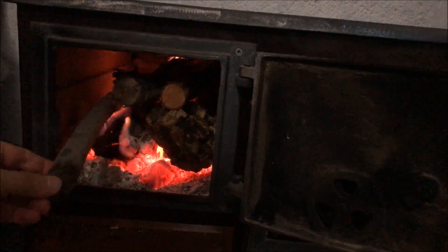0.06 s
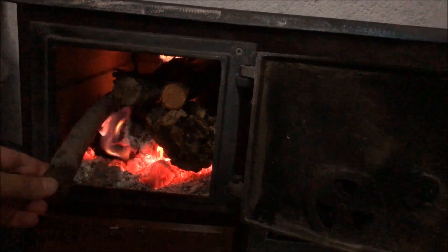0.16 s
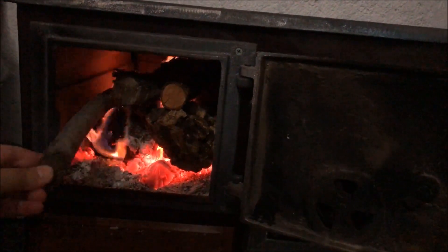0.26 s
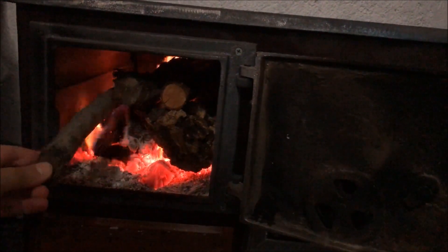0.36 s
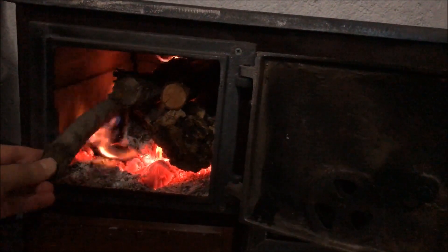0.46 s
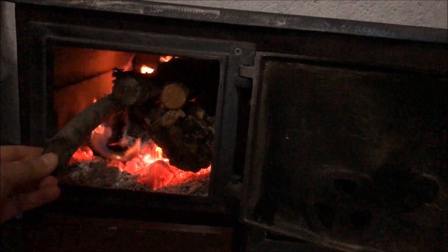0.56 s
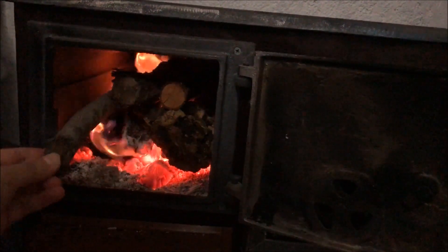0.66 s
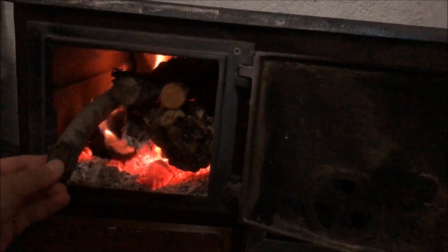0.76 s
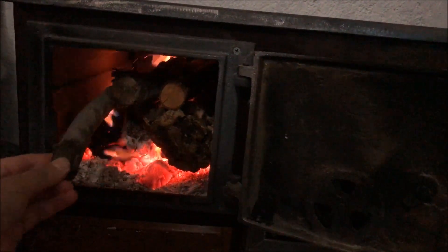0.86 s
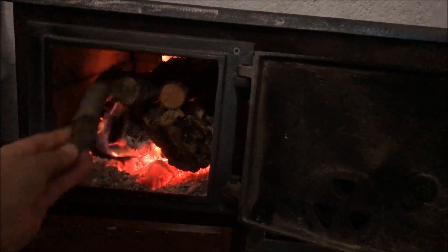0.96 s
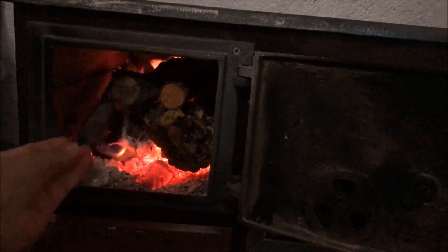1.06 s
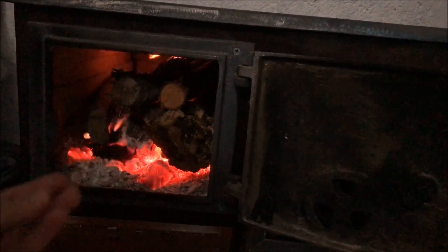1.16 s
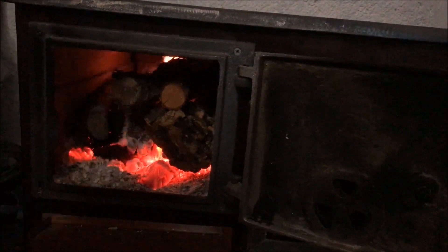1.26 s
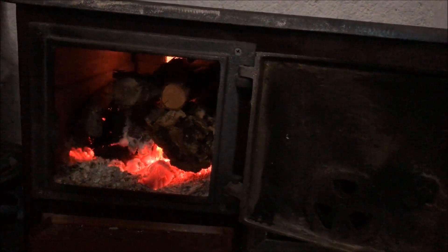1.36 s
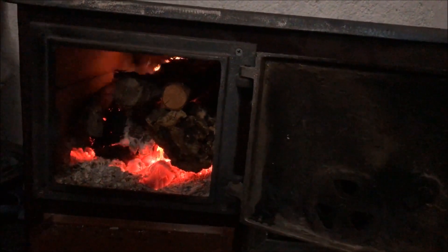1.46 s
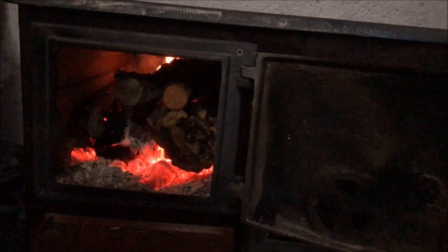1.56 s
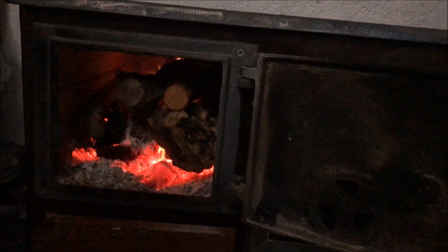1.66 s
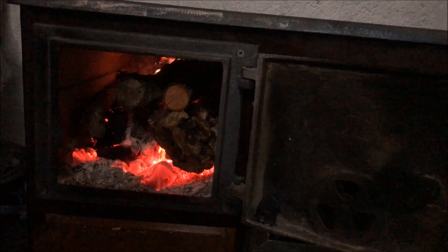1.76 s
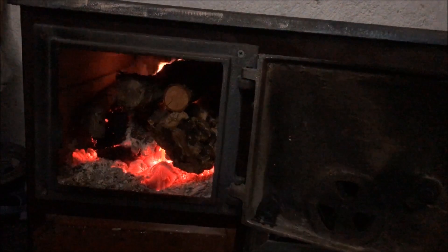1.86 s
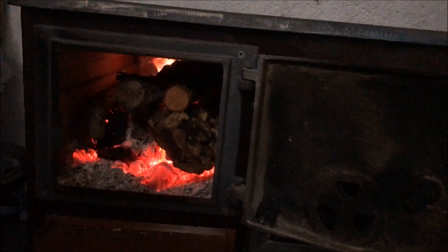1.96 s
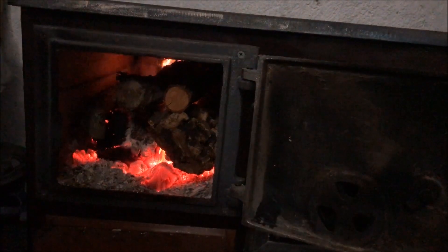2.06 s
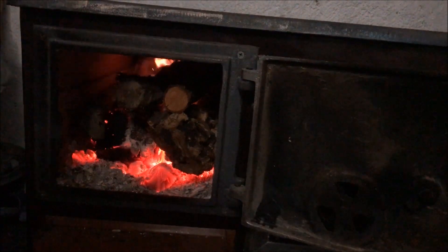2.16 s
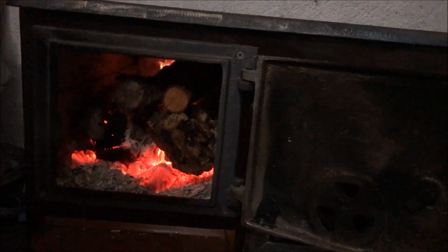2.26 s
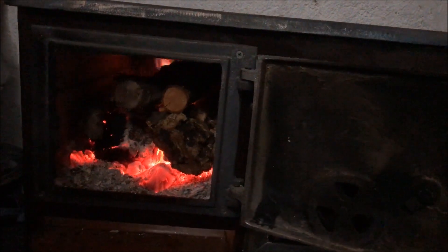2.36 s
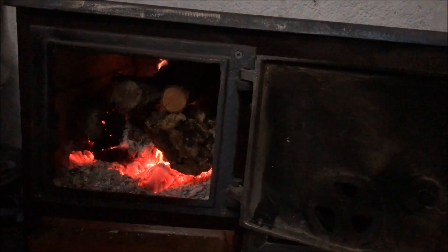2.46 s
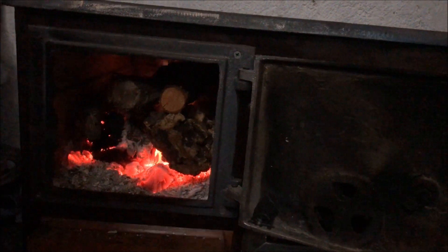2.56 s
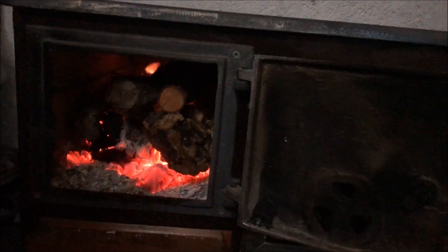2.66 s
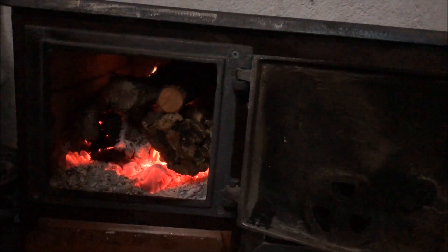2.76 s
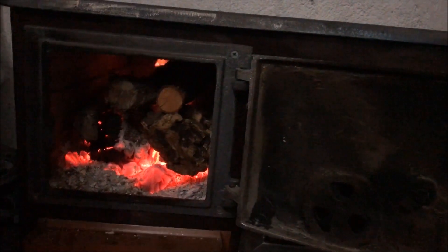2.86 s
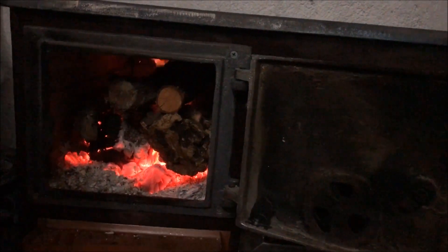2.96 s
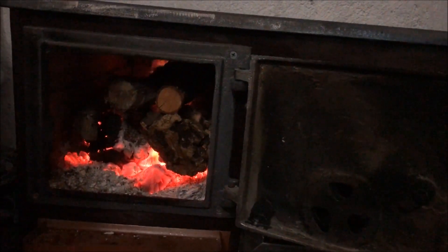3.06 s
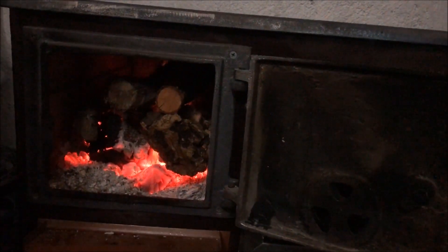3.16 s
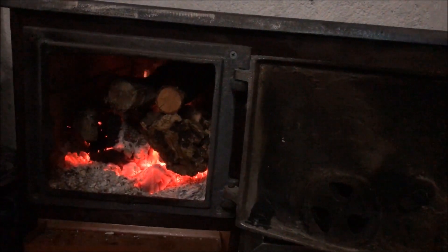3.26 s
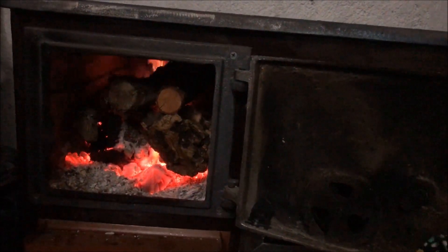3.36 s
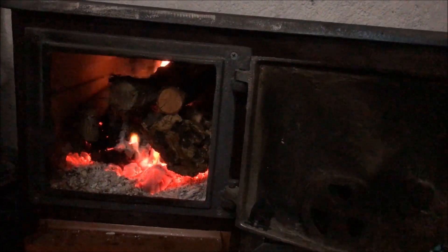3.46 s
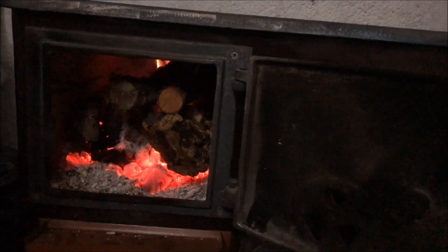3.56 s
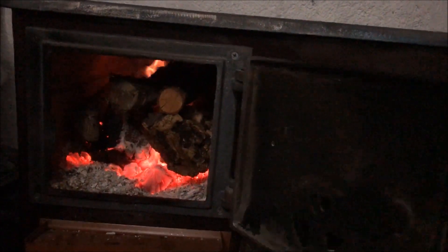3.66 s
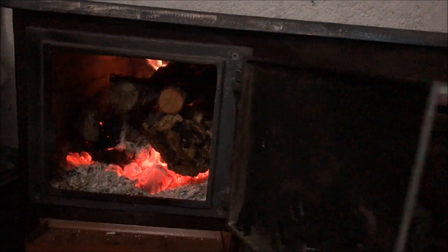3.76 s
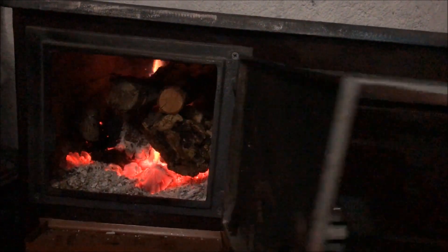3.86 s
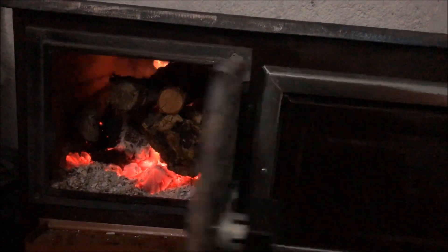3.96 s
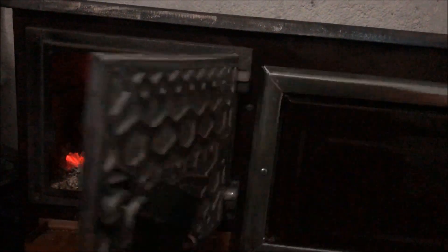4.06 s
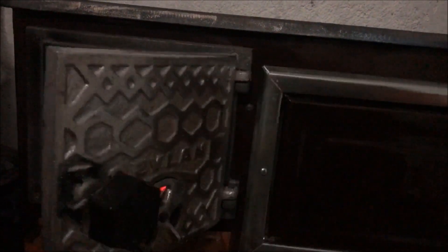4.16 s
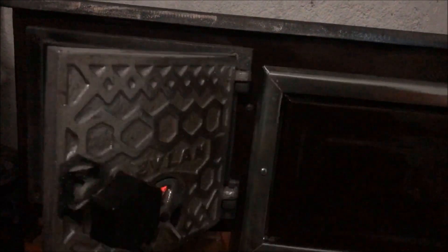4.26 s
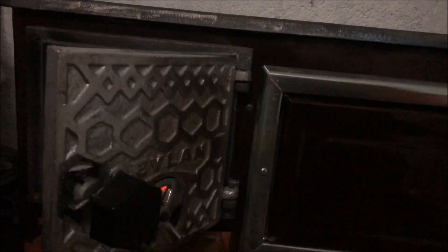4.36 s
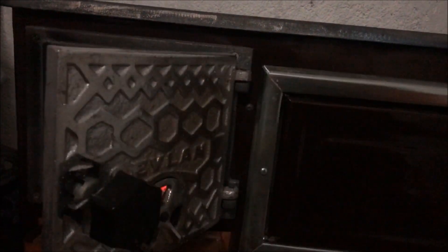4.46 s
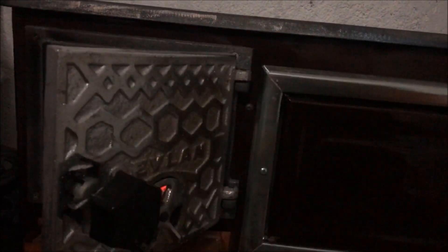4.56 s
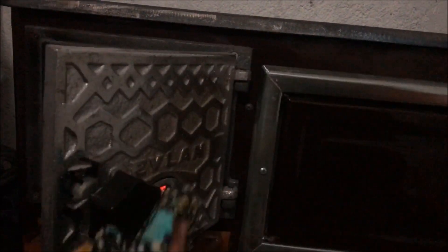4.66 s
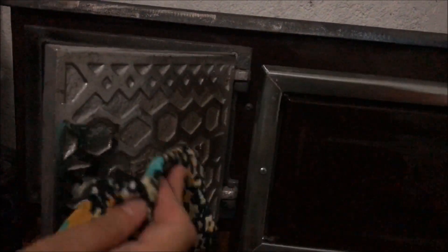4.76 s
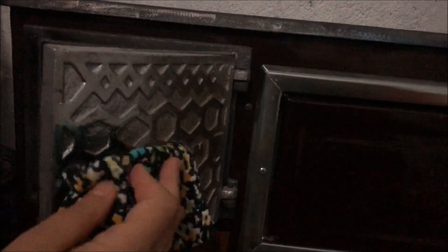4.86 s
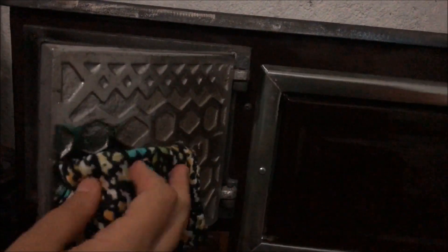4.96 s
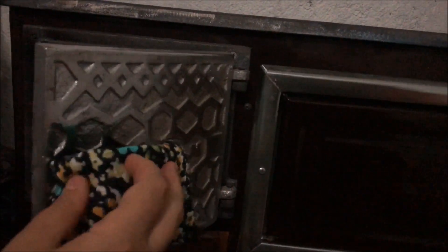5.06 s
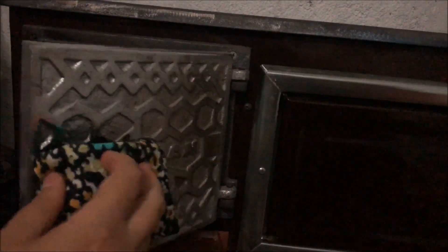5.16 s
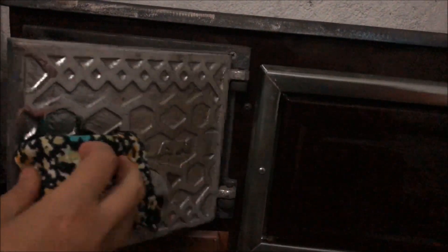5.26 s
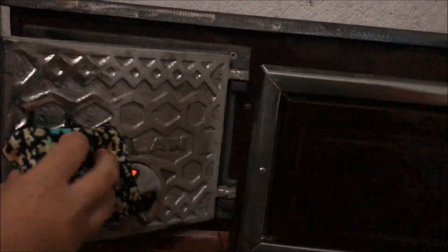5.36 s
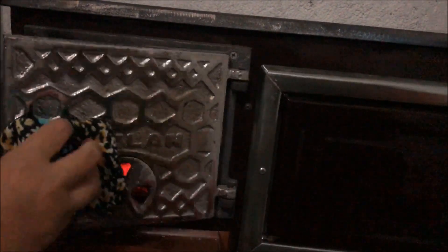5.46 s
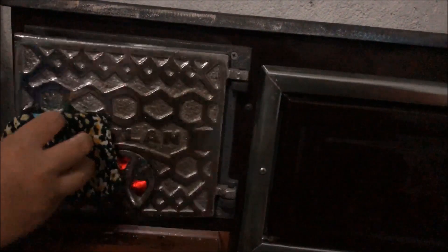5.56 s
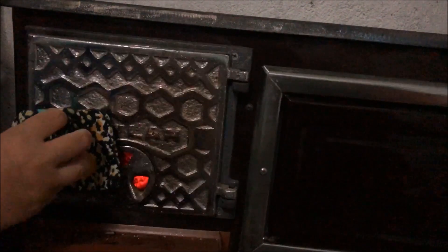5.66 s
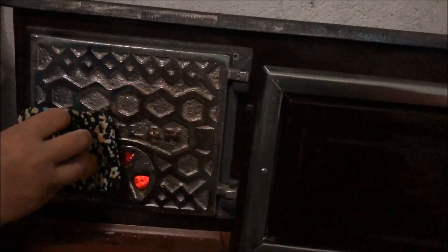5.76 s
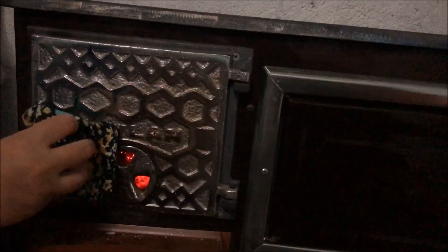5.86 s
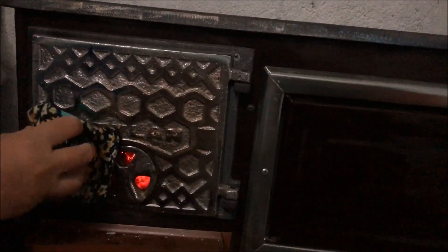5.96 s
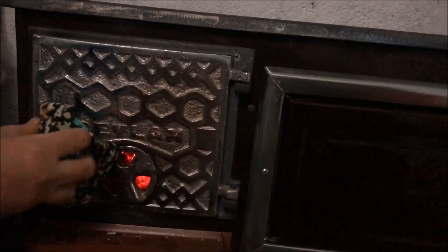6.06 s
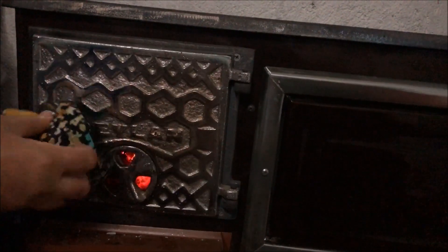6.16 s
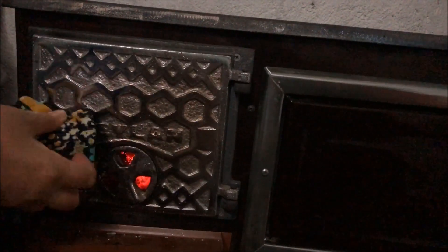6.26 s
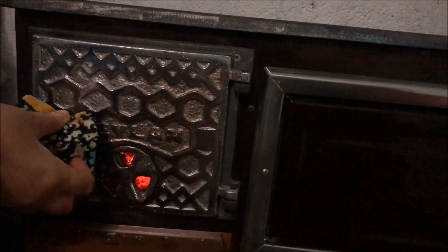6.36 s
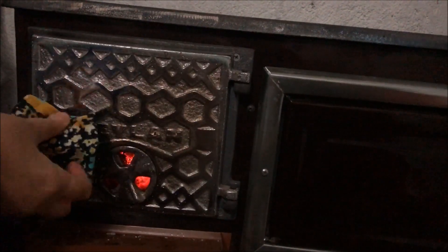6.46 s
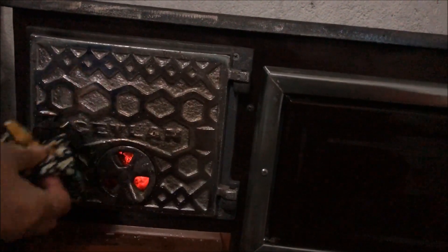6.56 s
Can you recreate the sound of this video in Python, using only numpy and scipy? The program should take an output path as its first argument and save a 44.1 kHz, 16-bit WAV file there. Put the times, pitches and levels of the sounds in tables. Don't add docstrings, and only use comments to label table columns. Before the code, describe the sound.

Fire crackles over a low flue rumble; wood knocks iron, a hinge squeaks and grinds, the stove door slams with a short clang, latch clunks.

```python
import sys
import numpy as np
from scipy import signal
from scipy.fft import rfft, irfft
from scipy.io import wavfile
from scipy.ndimage import uniform_filter1d

SR = 44100
rng = np.random.default_rng(int(sys.argv[2]) if len(sys.argv) > 2 else 0)


def unload_audio(sound):
    columns = np.transpose(np.atleast_2d(sound))
    steps = np.round(np.clip(columns, -1, 1) * 32767)
    wavfile.write(sys.argv[1], SR, steps.astype(np.int16))


def volts_from_decibels(level):
    exponent = np.asarray(level, float) / 20
    return 10 ** exponent


N = 291412

# pitch_hz, level_db (per Hz)
DRAUGHT_SPECTRUM = [(30, -31.5), (42, -10.5), (54, 1.5), (66, 0), (88, -8), (120, -8), (200, -6),
                    (300, -13.5), (540, -21), (800, -21), (1700, -27), (3400, -32.5), (8000, -42),
                    (15800, -47.5), (16200, -73.5)]
# start_s, level_db (over rest)
NOISE_SWELL = [(.3, 3.5), (1.05, -1.5), (1.18, 6), (1.32, 34.5), (1.4, 24), (1.54, -5), (1.75, -4.5),
               (2.4, -4.5), (3.2, 1.5), (3.75, 1.5), (4.15, 7.5), (4.36, -1), (5.12, -0.5), (5.26, 19),
               (5.89, 16.5), (6.13, 5), (6.45, 11), (6.61, -0.5)]
SWELL_SHARES = (0.097, 0.16, 0.97334, 0.23)
# rate_per_s, rumble_swing_db, roar_swing_db
GUSTS = (6.4, 2.6, 1)
# rate_per_s, size_spread_db, level_db
FIZZ = (230, 4.5, -3.5)
# start_s, length_s, level_db, pitch_hz, width_hz
SAP_STEAM = (3.265, .2, -64, 5500, 1600)

# start_s, peak_db, tilt_db (per octave)
SEEN_SNAPS = [(0.5741, -47, -3.5), (0.8138, -26.5, -4.5), (0.9207, -35, -6), (1.0100, -51, 4),
              (1.0419, -31.5, -2), (1.0587, -32.5, 7), (1.1157, -35, -4), (1.1858, -18.5, 0.5),
              (1.2152, -32.5, 0), (1.5843, -44, 0.5), (1.6197, -42.5, -6), (1.6793, -48.5, 2),
              (1.7167, -27, -3.1282), (1.7418, -26, 0), (1.8761, -35, -2.5), (2.0282, -23, -1.5),
              (2.3647, -46, -2.5), (2.4808, -43.5, -2.5), (2.507, -51.5, 3.5), (2.6492, -39.5, 0),
              (2.7441, -15.5, 0.5), (2.8366, -47, -3), (2.909, -43, 4), (2.9553, -35.5, -1.5),
              (3.2831, -20, -1), (3.3465, -15.5, 0), (3.663, -40, 9.5), (3.92, -42.5, 5),
              (5.5752, -38, -12), (3.653, -46.5, 14), (5.626, -45.5, 1.5), (5.6655, -42.5, -9),
              (6.443, -49.5, 15)]
# start_s, peak_db, tilt_db (per octave)
LANDING_SPARKS = [(1.369, -49, 6), (1.379, -49, 6), (1.397, -45, 4.5), (1.407, -52, 5), (1.413, -49, 4),
                  (1.427, -50, 6), (1.443, -41.5, 0), (1.486, -45, 2.5)]
# start_s, peak_db, tilt_db (per octave)
HIDDEN_SNAPS = [(0.2075, -51.5, -10), (0.3347, -41, 3), (0.4841, -43, 0), (0.5247, -46.5, -7.5),
                (1.017, -38.5, -3.5), (1.478, -50, 9), (2.152, -48, 5.5), (3.7017, -47, -4)]
# pitch_hz, level_db (per Hz)
SNAP_SPECTRUM = [(290, -60.5), (500, -27.5), (1210, -17), (1880, -16), (2600, -12.5), (5110, -8),
                 (8940, -10.5), (15200, -4), (16800, -10.5)]

# start_s, peak_db, contact_s, note_hz, note_db
STICK_KNOCKS = [(1.068, -62, 0.011, 1290, 5), (1.141, -46.5, 0.023, 322, 0), (1.187, -30.5, 0.006, 255, -6),
                (1.2328, -14, 0.019, 3950, -13.5), (1.249, -16.5, 0.017, 1119, -11.5),
                (1.2335, -25.5, 0.007, 1127, 1), (1.2345, -27, 0.0071, 970, 2),
                (1.275, -26.5, 0.033, 545, -12.5), (1.309, -34.5, 0.024, 749.4, 11),
                (1.319, -38.5, 0.014, 751, 10), (1.363, -39.5, 0.014, 773, 8), (1.386, -47, 0.015, 744, 7),
                (1.238, -30, 0.00811, 537, 6), (1.19, -44, 0.00423, 676, -1),
                (1.285, -34.5, 0.01758, 439, -6), (1.618, -57, 0.0123, 4040, -9)]
# pitch_hz, level_db (per Hz)
STICK_SPECTRUM = [(29, -51), (50, -11), (526, -2), (1040, -1), (1120, 3.5), (1230, -8), (1490, -2.5),
                  (1730, -10.5), (2000, -6), (5810, -30.5), (9680, -35), (15300, -52.5), (16500, -60)]
# pitch_hz, level_db, t60_s
GRATE_MODES = [(185.74, -10, 0.35), (244.16, -5.5, 0.2), (320, -12.5, 0.23), (366.58, -6, 0.83),
               (438.21, 0, 0.4), (489.5, -3.5, 0.38), (545, -1, 0.086), (748, -10, 0.81), (946, -5, 0.23),
               (1127, -6, 0.22), (1320, -7, 0.16), (2283, -24, 0.14), (3843.9, -2, 0.038),
               (4707, 0.5, 0.083)]

# start_s, slip_hz, level_db
GROAN = [
    (4.04, 474.2, -67),
    (4.118, 467.4, -40),
    (4.146, 466, -38.5),
    (4.156, 463, -69),
    (4.18, 470, -61.5),
]
GROAN_HARMONICS = [4, -5, -17, -20, -19.5, -19.5]
# start_s, slip_hz, level_db
CHIRP = [
    (3.959, 1153, -47),
    (3.966, 1155, -41.5),
    (3.982, 1140, -46),
    (3.996, 1267, -56),
    (4.07, 1164, -57),
    (4.1, 1310, -73),
]
# start_s, level_db
DRAG = [
    (3.5, -49),
    (3.55, -64),
    (3.68, -64),
    (3.86, -53.5),
    (3.99, -53.5),
    (4.086, -52.5),
    (4.136, -45),
    (4.26, -54.5),
    (4.42, -84),
]
# pitch_hz, width_hz, level_db
PIN_RESONANCES = [(635, 166.5, 7.5), (910, 29, -3.5), (1130, 47, -7), (1525.1, 25, -4.5), (2730, 350, -2.5),
                  (3430, 85, -2), (4610, 56, 1.5), (6173, 97, -36)]

# pitch_hz, level_db (per Hz)
IRON_SPECTRUM = [(120, -69.5), (200, -34.5), (573, -17.5), (702, -16.5), (860, -11.5), (1900, -4),
                 (2130, -7.5), (2400, -4), (4200, -13.5), (6430, -16), (7060, -18), (14800, -29.5),
                 (16500, -52.5)]
# pitch_hz, level_db, t60_s
DOOR_MODES = [(1001, -14, .35), (1297, -12, .5), (1625, -14, .15), (1895, -4, .17), (2239, -6, .12),
              (2399, -11, .3), (2433, -6.5, .25), (2670, -10, .18), (2913, -9, .25), (3636, -14, .22),
              (3790, -21, .2), (4506, -13, .13), (5308, -12, .13), (5609, -14, .18), (5841, -15, .18),
              (6277, -10, .22), (6560, -8, .13), (7348, -19, .15), (7843, -18, .16), (8382, -20, .13),
              (8651, -19, .13), (9841, -25, .13), (11150, -24, .12)]
# pitch_hz, level_db, t60_s
EDGE_MODES = [(1940, -10.5, 0.18), (2435, -4.5, 0.092), (2516, -3.5, .05), (2945, -10, 0.033),
              (5163.5, -8, 0.033), (5850, -10.5, 0.072), (6410, -4.5, .1), (7070, -17, 0.087)]
# start_s, peak_db, tilt_db (per octave), contact_s
SLAM = [
    (5.195, -42, -3.5, 0.047),
    (5.201, -30, 1.5, 0.03297),
    (5.209, -9, 2.5, 0.0042),
    (5.2126, -10, 0, 0.0016),
    (5.225, -18.5, -4.5, 0.02582),
]
# start_s, pitch_hz, level_db
PLATE_TONE = [
    (5.212, 695, -38),
    (5.292, 702.4, -34.5),
    (5.41, 702.5, -47),
    (5.46, 702.5, -56),
    (5.49, 703.3, -70),
]
# length_s, level_db, fade_db (per s), share left in a lull (0-1)
HUM = (2, -40.5, 84.5, 0)
# pitch_hz, level_db
HUM_MODES = [(474, 0.5), (528, -1), (945, -15)]
# start_s, peak_db, contact_s, boom_hz, boom_db
THUDS = [(1.15, -35, 0.013, 188, -7.5), (1.242, -29.5, 0.01604, 209, -1.5), (1.52, -40.5, 0.028, 196, -3.5),
         (3.95, -43.5, 0.092, 195, -9), (0.581, -52, 0.01463, 274.5, 1), (0.525, -50, 0.012, 205, -8),
         (0.591, -55, 0.01347, 186, 4.5), (0.617, -56.5, 0.015, 153, 1.5), (0.656, -58.5, .015, 226.4, 2.5),
         (0.715, -57.5, 0.015, 195.5, -2.5), (0.686, -65.5, 0.03, 96.15, 9),
         (3.358, -48.5, 0.02944, 92, -10), (3.859, -42, 0.063, 458, -18), (4.878, -47, 0.066, 93.09, -29),
         (5.24, -43, 0.02004, 138, -1.5), (5.262, -46, 0.027, 371.6, 5), (5.289, -50, 0.02, 382.9, 7),
         (5.501, -35.5, 0.042, 135.4, -8.5), (5.522, -39, 0.017, 144, -2), (5.597, -40.5, 0.027, 244, -2.5),
         (5.72, -33.5, 0.042, 149.7, -14.5), (5.757, -38.5, 0.031, 155, -5.5),
         (5.829, -38.5, 0.059, 104.8, -9.5), (5.855, -38.5, 0.03037, 193, -2),
         (5.91, -42.5, 0.017, 189.7, -2), (6.004, -45.5, 0.01443, 209, -3), (6.085, -52.5, 0.018, 147.4, 3),
         (6.191, -55, 0.023, 143.8, -1), (5.958, -39.5, 0.0762, 102, -9.5),
         (6.03, -43.5, 0.0236, 148.6, -3), (6.141, -51, 0.017, 145.4, -0.5), (6.24, -40.5, 0.0273, 556, -4),
         (6.329, -38, 0.11, 141, -17)]
# pitch_hz, level_db (per Hz)
FIREBOX_SPECTRUM = [(35, -41), (60, -13), (183, -1), (290, -4), (786, -9), (924, -15), (1500, -17.5),
                    (1950, -46.5), (3300, -120)]

# start_s, peak_db, tilt_db (per octave), note_db
HINGE_BLOWS = [(3.532, -51.5, 2.1931, -12), (3.838, -41.5, 4, -27.5), (3.844, -47.5, 7, -12),
               (3.9598, -46, -2, -16), (4.019, -46, -6, -27), (4.072, -47.5, -4, -27),
               (4.092, -44.5, -0.5, -9), (4.1266, -38, -3, -2.5), (4.178, -60.5, -12, -18),
               (4.231, -49, 4.5, -26)]
HANDLE_BLOWS = [(4.87, -55.5, -8, -34), (4.942, -55.5, 5, -19), (5.043, -36.5, 3.5, -21.5),
                (5.056, -37, -0.5, -22), (5.073, -36, 1.5, -24.5), (5.086, -37, -6, -20.5),
                (5.097, -42, -8.5, -11)]
LATCH_BLOWS = [(5.5006, -48.5, 1, -5.5), (5.6, -46, 3, -29), (5.722, -34.5, 4, -18),
               (5.834, -31.5, -7.5, -18), (5.858, -38.5, -10, -6), (5.9595, -41, -7.5, -4.5),
               (5.985, -40.5, -11, -6)]
BOLT_BLOWS = [(6.141, -54, -1, -11), (6.165, -50.5, 2, -18.5), (6.182, -52, 3.5, -31),
              (6.234, -34, -2.5, -22), (6.256, -44.5, 0, -23), (6.275, -43.5, -8, -5.5)]
CATCH_BLOWS = [(6.324, -37.5, 3, -13), (6.339, -34.5, 3, -13.5), (6.358, -41.5, -3.5, -11),
               (6.379, -44, -7.5, -6)]
# contact_s, note_hz, ring_db
PARTS = [
    (0.011, 945, -3.5),
    (0.016, 4600, -3),
    (0.01, 940, -7.5),
    (0.022, 800, -3.5),
    (0.013, 3200, -6),
]
# pitch_hz, level_db, t60_s
HINGE_MODES = [(1570, -10.5, 0.332), (2023.4, -2.5, 0.15), (3066.6, -3.5, 0.12), (3470, -7, .12),
               (3782.5, -3, 0.11), (4270, -0.5, 0.13), (4770, -7, .08), (5810, -8, .1), (7400, -9, 0.0587),
               (8260, -17, 0.2133)]
HANDLE_MODES = [(1500.2, -6, 0.21), (1833, -4.5, .2), (2410, -5.5, .3), (2840, -5.5, .2), (3430, -4.5, .25),
                (3960, -5, .1), (4589.3, -1, 0.21), (4860, -7.5, .3), (5320, -4, .3), (6200, -8, .3),
                (9685, -12.5, .2), (10240, -17.5, .2), (11287, -15.5, .25), (13500, -8.5, .25),
                (15330, -11.5, .12)]
LATCH_MODES = [(545, -3, 0.25), (940, -8, 0.2), (1200, -8, .2), (1375.7, -3, 0.2266), (1500, -14, 0.44),
               (1680, -19, 5.0), (2160, 1.5, 0.15), (2300, -7, 0.77), (2880, -9, 0.37), (3470, -12.5, 0.17)]
BOLT_MODES = [(556.26, -13, 0.1074), (718.51, -12, 0.47), (1090, -7, 0.1104), (1296.5, -23, 0.098),
              (1500, -11, 5.0), (1913, -4.5, 0.2847), (2120, -4, 0.11), (2360, -25, 0.4), (2990, -16, 0.25),
              (5047, -19, 0.3), (5464, -26, 0.23), (9970, -17, 0.1142)]
CATCH_MODES = [(2491.5, -16, 5.0), (2884, 2, 0.53), (3596.8, -2, .3), (4070, -5, 0.33), (4463, -5, 0.28),
               (4670, -17, 5.0), (5056, -11, 1.2), (6100, -9.5, 0.58), (6800, -2, 0.084), (7500, -19, 0.94),
               (8920, -18.5, 2.0), (11200, -12.5, 0.062)]

# pitch_hz, t60_s
ROOM_DECAY = [(100, 1), (400, 0.81), (1000, 0.49), (2500, 0.33), (6000, 0.29204), (14000, 0.16)]
# delay_s, level_db
ECHOES = [
    (.015, -11.5),
    (0.02, -16.5),
    (.028, -18.5),
]
# start_s, sparse_above_hz
THIN_MOMENTS = [(1.282, 5600), (1.303, 5600), (1.346, 3800), (2.092, 2200), (2.263, 1800), (3.479, 2800),
                (3.564, 4200), (3.586, 4200), (3.65, 3300), (4.162, 4500), (5.122, 6500), (5.164, 5200),
                (5.463, 3000), (5.591, 1900), (5.698, 3800), (5.719, 4500), (6.06, 2800), (6.38, 5000),
                (6.487, 3000)]


def evened(x):
    return x / np.sqrt(np.mean(x ** 2) + 1e-20)


def read(points, hz):
    f, value = np.transpose(points)
    return np.interp(np.log(hz + 1), np.log(f + 1), value)


def ramp(t, start, end):
    return np.clip((t - start) / (end - start), 0, 1)


def add(mix, s, sound):
    part = mix[round(s * SR):][:len(sound)]
    part += sound[:len(part)]


def coloured(x, spectrum, tilt_db, low_hz=0):
    hz = np.abs(np.fft.fftfreq(4096, 1 / SR))
    octaves = np.log2((np.maximum(hz, low_hz) + 100) / 3000)
    log_gain = (read(spectrum, hz) + tilt_db * octaves) * np.log(10) / 20
    taps = np.fft.ifft(np.exp(np.conj(signal.hilbert(log_gain)))).real[:2048]
    y = signal.oaconvolve(x, taps)
    return y / abs(y).max()


def burst(contact_s):
    t = np.arange(4096) / SR
    z = rfft(rng.standard_normal(len(t)) * np.exp(-t / contact_s))
    power = uniform_filter1d(abs(z) ** 2, size=15)
    return irfft(z / power ** .4)[:3000] * power.mean() ** -.1


def ring(modes, spread_db, damping, tilt_db=0):
    hz, db, t60 = np.transpose(modes)[:, :, None]
    t = np.arange(round(SR / 2.5 / damping)) / SR
    share, phase, split = rng.standard_normal((3, len(modes), 1))
    pair = np.sin(2 * np.pi * hz * t + phase) + .6 * np.sin(2 * np.pi * hz * (1 + .007 * split) * t)
    fade_db = 60 * damping * t / np.clip(t60, .04, .7)
    level_db = db + spread_db * share + tilt_db * np.log2(hz / 3000) - fade_db
    y = (volts_from_decibels(level_db) * pair).sum(0) * np.minimum(t * 2000, 1)
    return y / abs(y).max()


def note(hz, cycles):
    t = np.arange(SR // 5) / SR
    wobble = uniform_filter1d(rng.standard_normal(len(t)), 150).cumsum() / SR
    u = t / (0.011 + cycles / hz)
    return np.sin(2 * np.pi * hz * (t + .4 * wobble)) * np.sqrt(u) * np.exp(.5 - u ** 2)


def resonate(x, hz, width):
    turn = np.exp(2j * np.pi * np.cumsum(hz * np.ones(len(x))) / SR)
    r = np.exp(-np.pi * width / SR)
    return 2 * (turn * signal.lfilter([1 - r], [1, -r], x / turn)).real


def slips(rows, multiples_db, rough):
    s, hz, db = np.transpose(rows)
    t = np.arange(s[0], s[-1], 1 / SR)
    noises = rng.standard_normal((2, len(t)))
    waver, grip = (evened(uniform_filter1d(uniform_filter1d(x, 300), 300)) for x in noises)
    turns = np.cumsum(np.interp(t, s, hz) * (1 + 0.055 * rough * waver)) / SR
    tone = sum(volts_from_decibels(d) * np.cos(2 * np.pi * (k + 1) * turns + k) for k, d in enumerate(multiples_db))
    tone *= np.sqrt(2) * volts_from_decibels(np.interp(t, s, db) - 6.5) * (1 + rough * grip)
    return s[0], tone * signal.windows.tukey(len(t), .12)


def room(x):
    taps = np.zeros(SR)
    at = np.arange(500, SR - 20, 20)
    taps[at + rng.integers(0, 20, len(at))] = rng.choice([-1., 1.], len(at))
    taps *= np.minimum(np.arange(SR) / SR / 0.027, 1)
    hz, t, z = signal.stft(taps, SR, nperseg=256)
    tail = signal.istft(z * volts_from_decibels(-60 * t / read(ROOM_DECAY, hz)[:, None]), SR, nperseg=256)[1]
    tail /= np.linalg.norm(tail)
    for s, db in ECHOES:
        add(tail, s, volts_from_decibels([db]))
    return signal.fftconvolve(x, tail)[:N]


def coals(t):
    raked_db = 15.5 * ramp(t, 0.97, 1.03) * (1 - ramp(t, 1.23, 1.283))
    return raked_db + SWELL_SHARES[3] * np.interp(t, *np.transpose(NOISE_SWELL)) + 0.5 * ramp(t, 3.9, 4.3)


def draught():
    frames, hz = N // 512 + 5, np.fft.rfftfreq(2048, 1 / SR)
    a, b, patches = rng.standard_normal((3, 1025, frames))
    patches = evened(uniform_filter1d(uniform_filter1d(patches, 20, 0), 5, 1))
    flicker = rng.standard_normal(frames)
    t = np.arange(frames) * 512 / SR
    swell = np.interp(t, *np.transpose(NOISE_SWELL))
    per_s, rumble_db, roar_db = GUSTS
    gust = [np.interp(t * per_s, np.arange(80), rng.standard_normal(80)) for _ in range(2)]
    rumble = SWELL_SHARES[0] * swell + rumble_db * gust[0]
    roar = SWELL_SHARES[1] * swell + roar_db * gust[1]
    rustle = SWELL_SHARES[2] * swell
    swing = np.array([rumble, roar, rustle, coals(t)])
    centres_hz = [80, 230, 1100, 8000]
    weights = np.array([read(np.transpose([centres_hz, row]), hz) for row in np.eye(4)])
    flame_db = 1.1 * patches + 2.1 * flicker * weights[3][:, None]
    field_db = read(DRAUGHT_SPECTRUM, hz)[:, None] + weights.T @ swing + flame_db
    noise = signal.istft((a + 1j * b) * volts_from_decibels(field_db), nperseg=2048, noverlap=1536)[1][:N]
    return volts_from_decibels(-64.5) * noise


def embers():
    per_s, spread_db, db = FIZZ
    t = np.arange(N) / SR
    size = volts_from_decibels(spread_db * np.minimum(rng.exponential(1, N), 4)) * (rng.random(N) < per_s / SR)
    kind = rng.integers(0, 6, N)
    cracks = 0
    for k in range(6):
        crack = coloured(burst(.0012), SNAP_SPECTRUM, k - 1)
        cracks = cracks + signal.oaconvolve(size * (kind == k), crack)[:N]
    return volts_from_decibels(db - 83 + coals(t) - 5.5 * ramp(t, 3.9, 4.3)) * evened(cracks)


def sap():
    s, length_s, db, hz, width = SAP_STEAM
    u = np.arange(round(length_s * SR)) / SR / length_s
    hiss = evened(resonate(resonate(rng.standard_normal(len(u)), hz, width), hz, width))
    return s, volts_from_decibels(db) * hiss * np.minimum(u * 8, 1) * (1 - u)


def snaps():
    near, far = np.zeros((2, N))
    for rows, room_db in (SEEN_SNAPS + LANDING_SPARKS, -14), (HIDDEN_SNAPS, -1.5):
        smear = max(volts_from_decibels(room_db + 12), 1)
        for s, db, tilt_db in rows:
            weakness = volts_from_decibels(-0.36 * (max(db, -40) + 17.5))
            pop = 0.6 * burst(0.00068 * smear * weakness) + 0.26 * burst(0.00467)
            pop[0] = 1 / smear
            click = volts_from_decibels(db) * coloured(pop, SNAP_SPECTRUM, tilt_db, low_hz=3018)
            add(near, s + .0011, click)
            add(far, s, volts_from_decibels(room_db) * click)
    return near, far


def stick():
    out, notes = np.zeros((2, N))
    for s, db, contact_s, hz, note_db in STICK_KNOCKS:
        tilt_db = 3.1 * np.log2(hz / 1290)
        add(out, s, volts_from_decibels(db) * coloured(burst(contact_s), STICK_SPECTRUM, tilt_db))
        add(notes, s, volts_from_decibels(db + note_db) * note(hz, cycles=9.1))
    landing_s = STICK_KNOCKS[3][0]
    add(out, landing_s, volts_from_decibels(-21.5) * ring(GRATE_MODES, 0, 1.4))
    return out, notes


def hinge():
    s, db = np.transpose(DRAG)
    t = np.arange(s[0], s[-1], 1 / SR)
    grains = volts_from_decibels(2.8 * np.minimum(rng.exponential(1, len(t)), 3)) * (rng.random(len(t)) < 450 / SR)
    grit = rng.standard_normal(len(t)) * grains + 0.26 * rng.standard_normal(len(t))
    sag = 1 - 0.11 * np.clip(t - 3.95, -.2, .1)
    pin = 0
    for hz, width, level_db in PIN_RESONANCES:
        fade_db = 5 * ramp(t, 4.0, 4.1) * (hz > 4000)
        pin = pin + volts_from_decibels(level_db - fade_db) * resonate(grit, hz * sag, 2 * width) / np.sqrt(width)
    pin = evened(pin) + 0.23 * evened(resonate(grit, 1200, 2500))
    low = resonate(pin, 1743.2, 3386.3)
    bright_db = -8 - 0.61 * (db + 54)
    ground = low + volts_from_decibels(np.interp(t, s, bright_db) - 4.0) * (pin - low)
    out = np.zeros(N)
    add(out, s[0], volts_from_decibels(np.interp(t, s, db) - 5.5) * ground * signal.windows.tukey(len(t), .08))
    add(out, *slips(GROAN, GROAN_HARMONICS, rough=0.11))
    add(out, *slips(CHIRP, [0, -18], rough=0.4))
    return out


def hum():
    length_s, db, fade_db, depth = HUM
    start_s, lull_s, lulls_per_s = 4.158, 4.178, 18.2
    t = np.arange(0, length_s, 1 / SR)
    tone = 0
    for hz, level_db in HUM_MODES:
        drift_s = .0001 * evened(uniform_filter1d(rng.standard_normal(len(t)), 1500))
        tone = tone + volts_from_decibels(level_db) * np.cos(2 * np.pi * hz * (t + drift_s))
    rock = depth + (1 - depth) * abs(np.sin(np.pi * lulls_per_s * (t + start_s - lull_s)))
    level = volts_from_decibels(db - fade_db * t * (1 - 0.24 * t))
    return start_s, level * rock * tone / np.sqrt(uniform_filter1d(tone ** 2, 900))


def small_blows(out, notes):
    blows = HINGE_BLOWS, HANDLE_BLOWS, LATCH_BLOWS, BOLT_BLOWS, CATCH_BLOWS
    modes = HINGE_MODES, HANDLE_MODES, LATCH_MODES, BOLT_MODES, CATCH_MODES
    for rows, (contact_s, hz, ring_db), own in zip(blows, PARTS, modes):
        held = [(f, d, min(t60, .29 * (3000 / f) ** .3)) for f, d, t60 in own]
        for s, db, tilt_db, note_db in rows:
            add(out, s, volts_from_decibels(db - 2.5) * coloured(burst(contact_s), IRON_SPECTRUM, tilt_db))
            add(notes, s, volts_from_decibels(db + note_db) * note(hz, cycles=13.0))
            add(out, s, volts_from_decibels(db + ring_db) * ring(held, 3.6, damping=2.1, tilt_db=0.27 * tilt_db))


def door():
    out, notes = np.zeros((2, N))
    small_blows(out, notes)
    for s, db, tilt_db, contact_s in SLAM:
        add(out, s, volts_from_decibels(db) * coloured(burst(contact_s), IRON_SPECTRUM, tilt_db))
    for s, *_ in SLAM[2:4]:
        add(out, s, volts_from_decibels(-13) * ring(EDGE_MODES, 1, 2.0))
    add(out, SLAM[2][0], volts_from_decibels(-12.5) * ring(DOOR_MODES, 0, 2.3))
    for s, db, contact_s, hz, boom_db in THUDS:
        add(out, s, volts_from_decibels(db - 5.0) * coloured(burst(contact_s), FIREBOX_SPECTRUM, 0))
        add(notes, s, volts_from_decibels(db + boom_db) * note(hz, cycles=5.4))
    return out, notes


def trimmed(x):
    top = x - signal.oaconvolve(x, signal.firwin(401, 15950, window=("kaiser", 8), fs=SR), "same")
    power = uniform_filter1d(np.diff(x, prepend=0) ** 2, size=60) + 1e-14
    sharp = uniform_filter1d(1. * (power > 40 * np.roll(power, 250)), size=100)
    return x - top * (1 - np.clip(4 * sharp, 0, 1))


def thinned(x):
    frame_s = 1024 / 48000
    m, out = round(frame_s * SR), x.copy()
    n = np.arange(2 * m) + .5
    window = np.sin(np.pi * n / (2 * m))
    basis = np.sqrt(2 / m) * window * np.cos(np.pi / m * np.outer(n[:m], n + m / 2))
    hz = n[:m] * SR / 2 / m
    for s, edge_hz in THIN_MOMENTS:
        slippage = round(round(s, 1) * SR / 4700)
        start = round(s / frame_s) * m + round(.0017 * SR) - m - slippage
        at = slice(start, start + 2 * m)
        c = basis @ x[at]
        near_edge = (hz > .85 * edge_hz) & (hz < 1.15 * edge_hz)
        step = 3.1 * np.sqrt(np.mean(c[near_edge] ** 2))
        lost = (c - step * np.round(c / step)) * (hz > edge_hz / 2)
        out[at] -= lost @ basis
    return out


def scene():
    near, far = snaps()
    wood, wood_notes = stick()
    swing = hinge()
    iron, iron_notes = door()
    tones = wood_notes + iron_notes
    add(tones, *sap())
    far = far + volts_from_decibels(-16) * tones
    add(tones, *hum())
    add(tones, *slips(PLATE_TONE, [5.5], rough=.03))
    wet = room(far + volts_from_decibels(-7.0) * wood + volts_from_decibels(-7.0) * iron + volts_from_decibels(-13.5) * swing)
    return (draught() + embers() + near + wood + swing + iron + tones + wet)[None]


def band_limit(x):
    return signal.sosfilt(signal.butter(12, 16990, fs=SR, output="sos"), x)


def record(dry):
    thin = signal.sosfilt(signal.butter(4, 44, "high", fs=SR, output="sos"), dry)
    edge = signal.firwin(255, 16700, window=("kaiser", 9), fs=SR)
    limited = signal.oaconvolve(thin[0], edge, "same")
    mix = thinned(trimmed(limited))[None]
    return band_limit(mix)


dry = scene()
out = record(dry)
unload_audio(out)
```